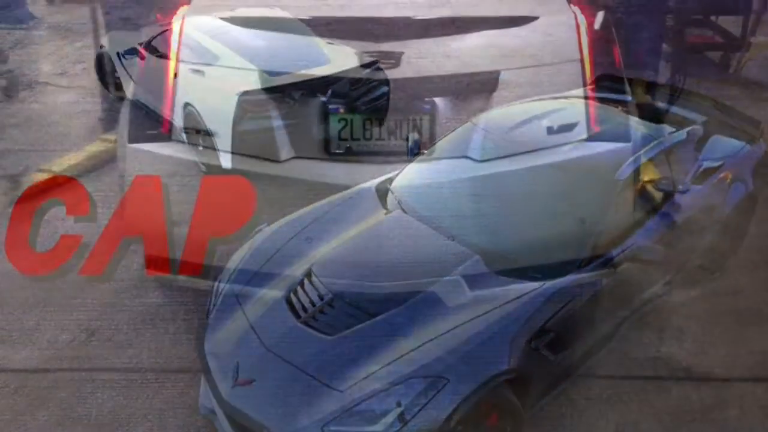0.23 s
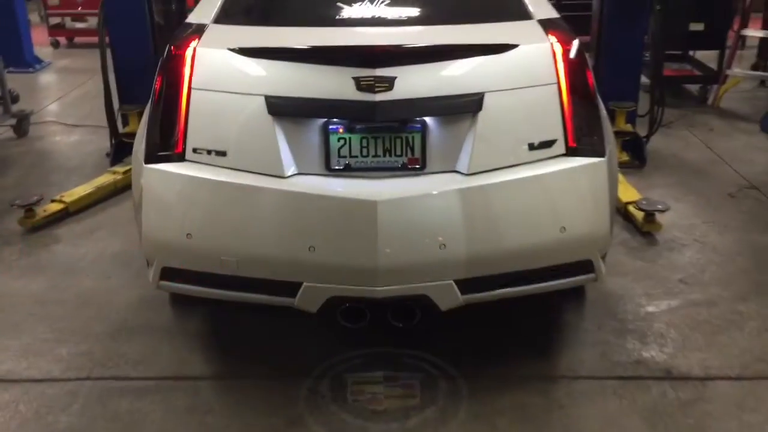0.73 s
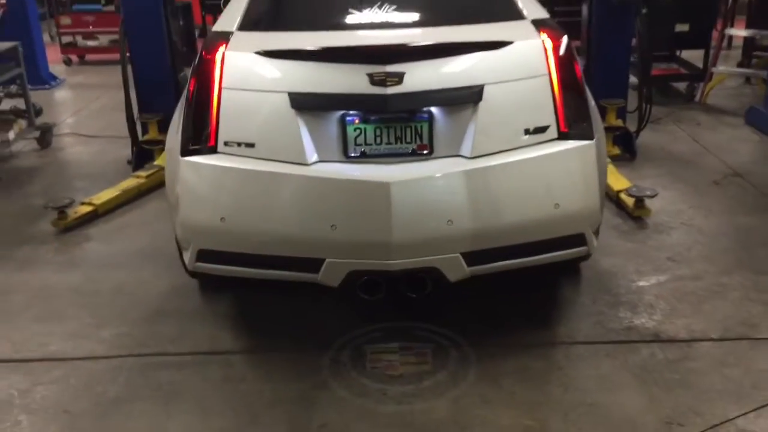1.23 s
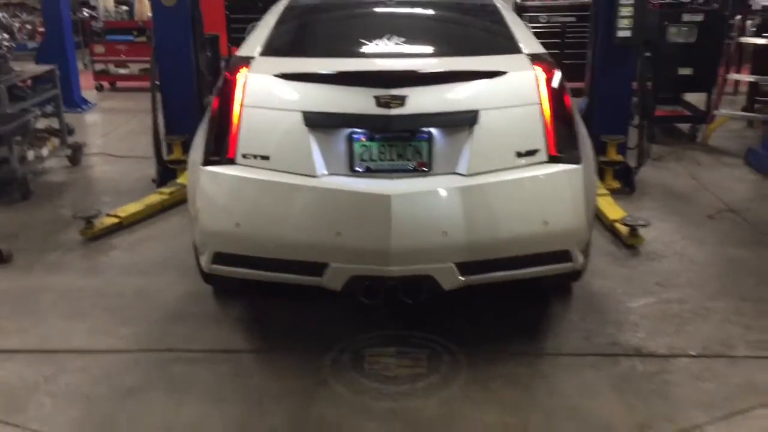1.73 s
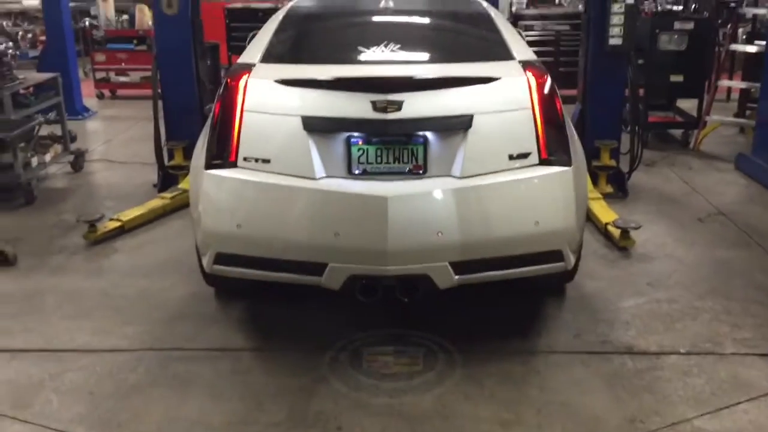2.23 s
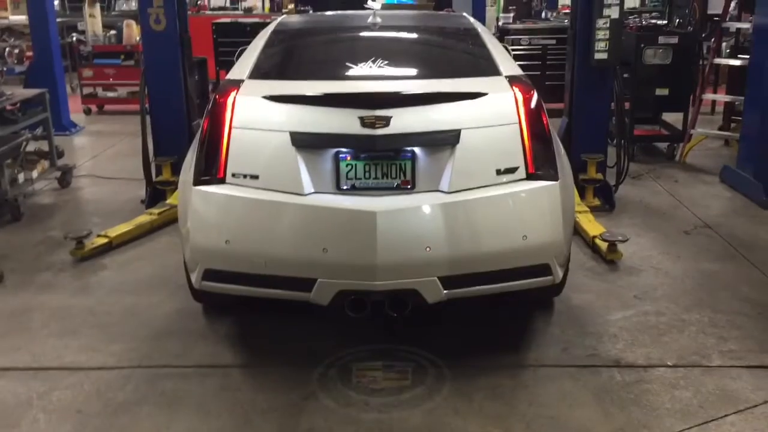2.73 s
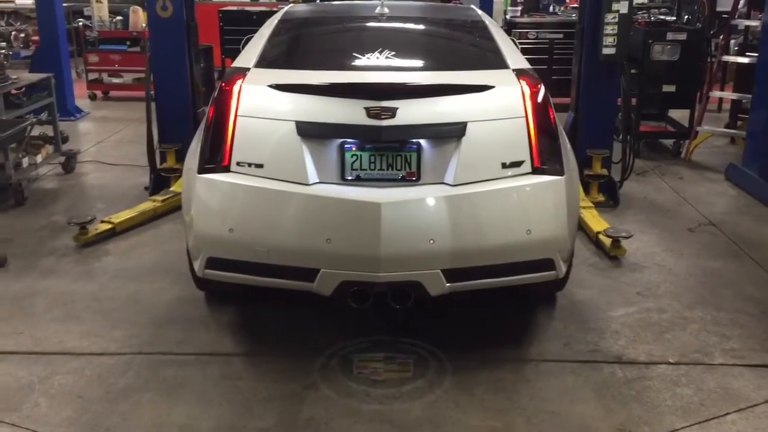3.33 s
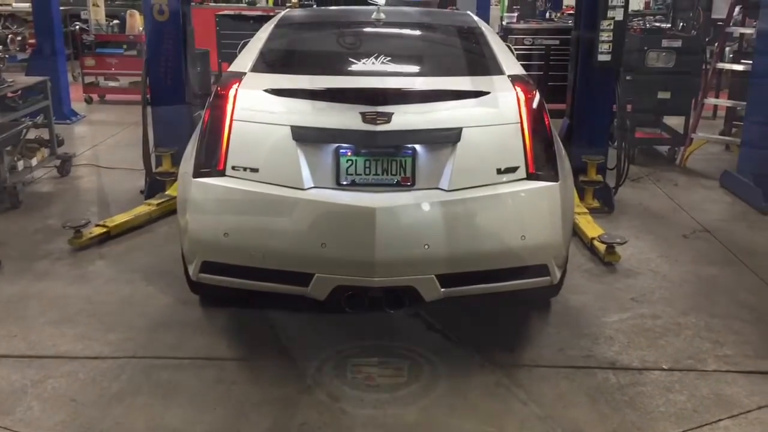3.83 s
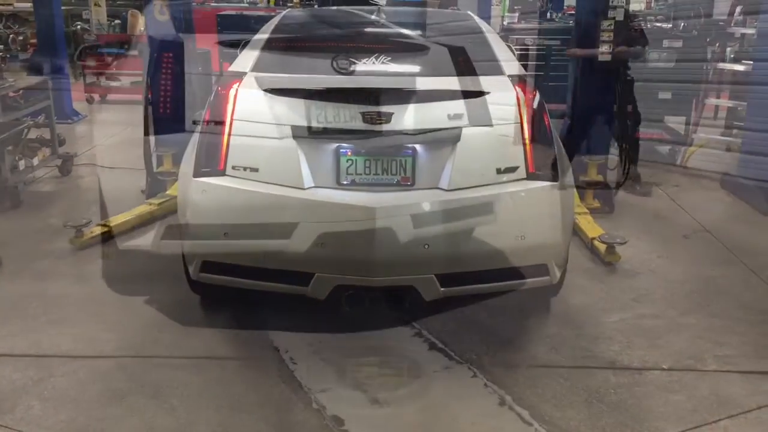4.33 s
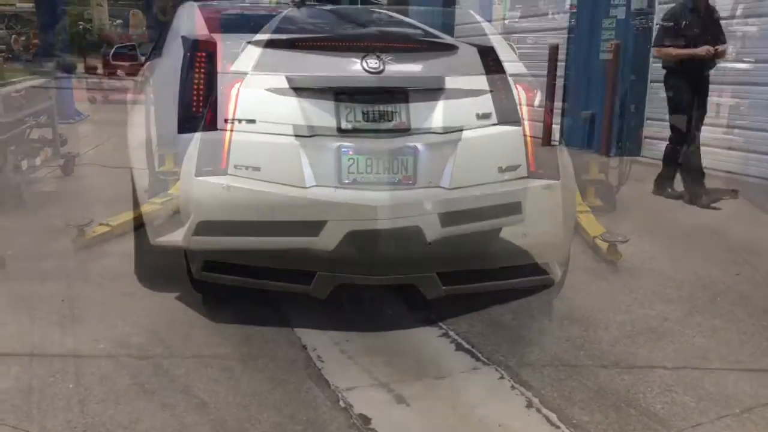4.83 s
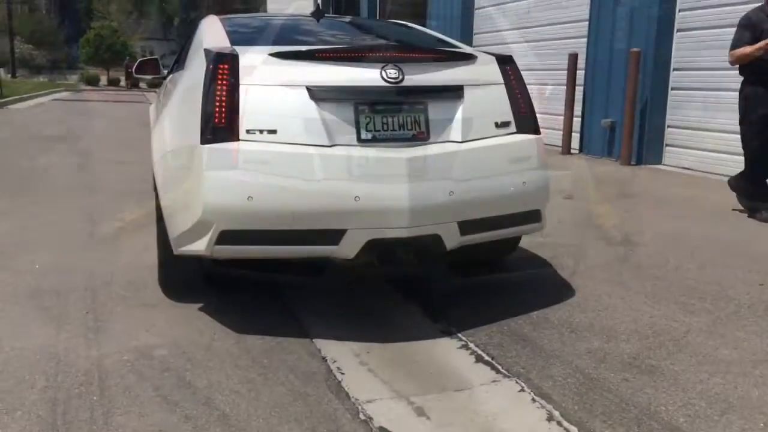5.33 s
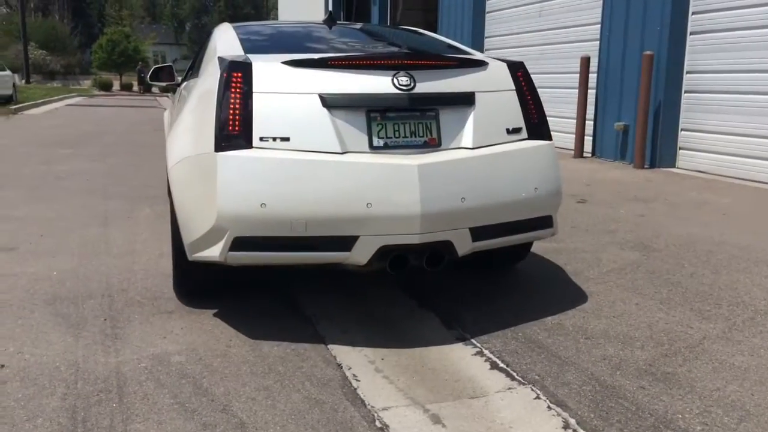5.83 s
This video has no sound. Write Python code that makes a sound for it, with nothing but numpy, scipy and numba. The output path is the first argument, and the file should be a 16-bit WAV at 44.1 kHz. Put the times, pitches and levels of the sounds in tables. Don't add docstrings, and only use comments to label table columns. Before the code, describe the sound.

A phone microphone behind the tailpipes catches a loping V8 idle, about three surges a second, with clustered metallic crackles and hissing gas over low pipe boom, reverberant indoors. The sound dissolves into open air: steadier humming and rumbling, a brief stumble, then a hard rev. Pitch rises quickly, bass drops away as the microphone overloads, and a coarse midrange howl and roar remains.

```python
import sys
import numpy as np
from scipy import signal
from scipy.fft import rfft, irfft, next_fast_len
from scipy.io import wavfile
from scipy.ndimage import uniform_filter1d
from numba import njit

SR = 44100
rng = np.random.default_rng(int(sys.argv[2]) if len(sys.argv) > 2 else 0)


def dump(signal):
    limited = np.clip(np.atleast_2d(signal).T, -1, 1)
    pcm = np.round(limited * 32767).astype(np.int16)
    wavfile.write(sys.argv[1], SR, pcm)


def nominal_scale(level):
    x = np.asarray(level, float) / 20
    return 10 ** x


N = 268524
T = np.arange(N) / SR
IDLE_FIRING_HZ = 46.2


# first t/s, last t/s, first level/dB, last level/dB, treble share level/dB
FIRING_RUNS = [(.078, .143, -16, -15, -25.5), (0.21, .227, -25, -23.5, -8), (0.333, .381, -15, -12, -14),
               (0.691, .719, 1, 0, -18.5), (0.774, 0.838, -1.5, -10, -18.5), (0.971, 0.995, -5.5, -7, -16),
               (1.036, 1.066, 0.7, -4.5, -20.5), (1.253, 1.28, -10, -4.5, -19.5),
               (1.322, 1.345, -4.5, -4.5, -17), (1.448, 1.47, -8.5, -7.5, -20),
               (1.581, 1.693, -5.5, -14, -19), (1.843, 1.889, -7, -13, -15), (2.171, 2.344, -12, -8, -14),
               (2.403, 2.503, -21, -32, -18), (2.522, 2.636, -18, -0.5, -14), (2.673, 2.697, -8, -2, -21.5),
               (2.881, 2.927, -13.5, -6.5, -21), (3.117, 3.186, -34, -19, -26.5),
               (3.21, 3.255, -12.5, -7, -11.5), (3.3, 3.36, -7, -7.5, -18), (3.562, 3.666, -6, -2, -18),
               (3.905, 4.008, -7.5, -6.5, -21), (4.463, 4.51, -17, -9.5, -14),
               (4.558, 4.574, -9, -6, -15.5)]
# t/s, peak level/dB, treble share level/dB
LONE_FIRINGS = [(.012, -17.5, -7.5), (.292, -16.5, -5.5), (.427, -5.5, -21), (.486, -2.5, -17),
                (.577, -5.5, -14), (.648, -6, -18), (.928, -5, -16.5), (1.123, -5.5, -18.5),
                (1.192, -18.5, -13), (1.383, -8, -13), (1.538, -8.5, -21), (1.733, -2, -23),
                (1.767, -18.5, -2.5), (1.799, -19, -15), (1.936, -7.5, -6), (1.952, -22, -9),
                (1.997, -8, -21), (2.06, -6.5, -15.5), (2.81, -17, -9.5), (2.969, -3.5, -19),
                (3.033, -17, -14), (3.703, -5.5, -10), (3.86, -8, -15.5), (4.104, -19, -6),
                (4.159, -12.5, -8), (4.206, -2, -17.5), (4.257, -7, -36), (4.384, -32, -22),
                (4.688, -27, -19)]


def hard_firings():
    timing_jitter_s, treble_scatter_db = 0.0012, 0.5
    rows = [np.array(LONE_FIRINGS)]
    for first, last, first_db, last_db, treble_db in FIRING_RUNS:
        count = int(round((last - first) * IDLE_FIRING_HZ)) + 1
        share = np.linspace(0, 1, num=count)
        chance = rng.standard_normal((2, count))
        times = first + share * (last - first) + timing_jitter_s * chance[0] * (share > 0)
        levels = first_db + share * (last_db - first_db)
        rows.append(np.transpose([times, levels, treble_db + treble_scatter_db * chance[1]]))
    return np.concatenate(rows).T


def spits():
    rise_s, jet_rise_s, fall_s = 0.004, 0.0018, 0.0087
    s, peak_db, treble_db = hard_firings()
    at = (s * SR).astype(int)
    t = T[:SR // 8]
    gust = (1 - np.exp(-t / rise_s)) * np.exp(-t / fall_s)
    jet_gust = 0.78 * (1 - np.exp(-t / jet_rise_s)) * np.exp(-t / fall_s)
    cracks, treble = np.zeros((2, N))
    cracks[at] = nominal_scale(peak_db)
    treble[at] = nominal_scale(peak_db + treble_db - np.mean(treble_db))
    return cracks, signal.fftconvolve(cracks, gust)[:N], signal.fftconvolve(treble, jet_gust)[:N]


# f/Hz, width f/Hz, level/dB
TIP_MODES = [(866, 82, 4.5), (1122, 86, 3), (1535, 69, -1), (1923, 113, -1.5), (2169, 41, -1.5),
             (2480, 340, -6), (3620, 277, -4), (4210, 630, -8.5)]


def tailpipe_tips(cracks, gust, flow):
    push = crackle(2.43, 150) * (nominal_scale(-9) * gust + flow) + nominal_scale(5) * cracks
    return nominal_scale(13) * ring(push, TIP_MODES, patchy_db=3, rate=35)


# f/Hz, level/dB per Hz
JET_SPECTRUM = [(1470, -8), (2500, -10), (3030, -13), (3670, -2.5), (4940, -5), (8840, -5.5),
                (10400, -10.5), (14600, -15.5), (15600, -21)]
# f/Hz, width f/Hz, level/dB
JET_EDGES = [(3380, 460, -1), (4130, 440, 7), (5800, 620, -14), (6850, 120, -17), (9180, 1900, -9),
             (12400, 1600, -0.5)]


def treble_jet(jet_gust, flow, flow_db):
    air = crackle(3.3, 120)
    edges = unit(ring(air, JET_EDGES, True, patchy_db=4.5, rate=45))
    jet = unit(colour(air, JET_SPECTRUM)) + nominal_scale(-4) * edges
    weak_flow_loss = np.clip(nominal_scale(0.75 * (flow_db + 21)), 0, 1)
    return jet * (nominal_scale(-9) * jet_gust + flow * weak_flow_loss)


# t/s, level/dB, f/Hz
CATCHES = [(.0, -22, 87), (.16, -23.5, 77), (0.309, -17.5, 86.4), (.43, -19.5, 89), (.52, -13.5, 72.4),
           (.75, -12.5, 71.6), (.91, -14, 78), (1.03, -12.5, 76), (1.26, -12, 77), (1.368, -24, 74.4),
           (1.46, -15.5, 81), (1.61, -13, 76), (1.73, -21, 92), (1.82, -13, 83), (1.96, -14, 84.5),
           (2.11, -13, 73), (2.2, -12.5, 75), (2.33, -15.5, 66.6), (2.489, -12.5, 83), (2.58, -12, 81.5),
           (2.68, -19, 94), (2.77, -14.5, 80), (2.91, -11.5, 82), (3.05, -19, 92), (3.23, -9.5, 80.5),
           (3.401, -13.5, 66.6), (3.58, -14, 80), (3.69, -14.5, 65.6), (3.875, -13.5, 78), (4.02, -19, 73),
           (4.14, -18, 80), (4.26, -18, 83), (4.36, -12.5, 86), (4.52, -12.5, 84.5), (4.63, -14, 101),
                (4.74, -12.5, 101)]


def catches():
    ring_up_s = 0.0149
    s, boom_db, boom_hz = np.transpose(CATCHES)
    kicks = np.zeros(N)
    kicks[(np.clip(s - ring_up_s, 0, None) * SR).astype(int)] = nominal_scale(boom_db)
    level_db = swells(s, s, boom_db, rise=102, fall=67, rest_db=-27)
    return kicks, level_db, np.interp(T, s, boom_hz)


# f/Hz, width f/Hz, level/dB
LOWEST_PIPE_MODE = [(45.5, 6.8, 3.5)]


def pipe_boom(thumps, boom_db, boom_hz):
    width_hz = 20.6
    boom = unit(svf(svf(thumps, boom_hz, width_hz), boom_hz, width_hz))
    low = unit(ring(thumps, LOWEST_PIPE_MODE, True))
    return nominal_scale(boom_db) * steady(boom + nominal_scale(-15) * low, 0.05)


# f/Hz, width f/Hz, level/dB
BARK_MODES = [(129.1, 18, 5.5), (191.6, 36, -5.5), (241.4, 18, 1.5), (286.2, 26, -4), (346.5, 73, -18)]


def pipe_bark(thumps, bark_db):
    return nominal_scale(bark_db) * steady(ring(thumps, BARK_MODES, True, patchy_db=3.0, rate=12), 0.09)


# f/Hz, width f/Hz, level/dB
HOLLOW_MODES = [(460, 220, 9.5), (555, 196, 12), (620, 73, -44)]


def hollow_body(bark_db):
    return nominal_scale(bark_db - 24) * steady(ring(rng.standard_normal(N), HOLLOW_MODES, True, patchy_db=3.5), 0.1)


# start t/s, length t/s, bark level/dB, gas flow level/dB
LOPES_OF_IDLE = [(0.028, .15, -23, -22.5), (0.299, 0.16, -18, -19.5), (0.644, 0.15, -15, -18),
                 (0.955, 0.17, -14, -17.5), (1.26, .14, -15, -17.5), (1.462, 0.067, -17.5, -19),
                 (1.62, 0.11, -16, -17.5), (1.886, 0.16, -16, -14.5), (2.18, 0.16, -15, -18),
                 (2.534, 0.16, -15, -18.5), (2.912, 0.13, -13.5, -14.5), (3.209, 0.14, -14.5, -16),
                 (3.567, 0.14, -14, -22), (3.863, 0.15, -16.5, -18.5), (4.131, 0.18, -18, -16),
                 (4.443, 0.21, -18.5, -19.5), (4.84, .25, -21.5, -2)]


def lope():
    start, length, bark_db, flow_db = np.transpose(LOPES_OF_IDLE)
    peak = start + 0.84 * length
    bark = swells(peak, peak, bark_db, rise=45, fall=61, rest_db=-23.5)
    flow = swells(start + 0.34 * length, start + length, flow_db, rise=100, fall=186, rest_db=-31.5)
    return bark, flow


# t/s, boom level/dB, gas flow level/dB
WORKSHOP_FADE = [
    (0, 0, 0),
    (4.3, 0, 0),
    (4.72, 0, -10),
    (4.82, -14, -16),
    (5.2, -20, -26),
]


def workshop():
    bark_db, flow_db = lope()
    kicks, boom_db, boom_hz = catches()
    boom_fade, flow_fade = nominal_scale(curves(WORKSHOP_FADE, -124))
    idle_hz = np.full(N, IDLE_FIRING_HZ)
    pulses, phase, size = firings(idle_hz, jitter=0.21, scatter_db=1.5)
    cracks, gust, jet_gust = spits()

    thumps = unit(pulses) + 0.32 * size * rng.standard_normal(N)
    thumps = thumps + 0.67 * unit(np.sqrt(cracks)) + 0.45 * unit(kicks)

    flow = flow_fade * nominal_scale(flow_db - 9.5) * unit(size * (1.6 + np.exp(-phase / 0.31)))
    gas = walls(tailpipe_tips(cracks, gust, flow), t60_s=0.36, db=-5)
    gas = gas + nominal_scale(-2.5) * walls(treble_jet(jet_gust, flow, flow_db), t60_s=0.31, db=-6.5)
    gas = signal.sosfilt(signal.butter(6, 790, "high", fs=SR, output="sos"), gas)
    pipes = pipe_bark(thumps, bark_db) + hollow_body(bark_db)
    return boom_fade * pipe_boom(thumps, boom_db, boom_hz) + (T < 5.2) * (pipes + gas)


# f/Hz, level/dB per Hz
WIDE_SPECTRUM = [(26, -62), (45, -19.5), (262, -14), (334, -14), (495, -9.5), (559, -7.5), (868, -7),
                 (1380, -9), (1520, -9), (2150, -11.5), (2880, -8.5), (3590, -11), (10800, -18),
                 (14100, -22), (15600, -30)]
# f/Hz, width f/Hz, level/dB
WIDE_MODES = [(508, 75, -8), (811.4, 43.6, -18), (1173, 150, -4.5), (1650, 58, -18)]
# t/s, f/Hz
HOWL_PITCH = [
    (5.4, 1390),
    (5.55, 1390),
    (5.7, 1320),
    (5.8, 1400),
    (5.95, 1350),
    (6.1, 1330),
]


def wide_open_roar(gate):
    width_hz = 110.0
    howl_hz = curves(HOWL_PITCH)[0] * (1 + 0.025 * walk(14))
    rush = gate * crackle(1.3, 150)
    howl = unit(svf(rush * nominal_scale(4 * walk(35)), howl_hz, width_hz))
    overtone = unit(svf(rush * nominal_scale(5 * walk(35)), 2.07 * howl_hz, 1.6 * width_hz))
    wide = unit(colour(rush, WIDE_SPECTRUM)) + nominal_scale(-5) * ring(rush, WIDE_MODES, True, patchy_db=4, rate=40)
    return wide + nominal_scale(-7.5) * (howl + nominal_scale(-5.5) * overtone)


# f/Hz, level/dB per Hz
PART_SPECTRUM = [(350, -28), (600, -1), (879, -10.5), (1010, -3.5), (1140, 6.5), (1240, -3), (1710, -2.5),
                 (2190, -9.5), (3160, -6), (3530, -10), (5920, -14), (14300, -25.5), (15600, -31)]
# f/Hz, level/dB per Hz
LIGHT_SPECTRUM = [(380, -43), (640, -19), (792, -9), (918, 1.5), (1790, -9), (2530, -11.5), (2890, -4.5),
                  (3630, -10.5), (4040, -8.5), (8420, -11.5), (12100, -15.5), (15600, -21)]


def exhaust_roar(gate):
    hiss = gate * rng.standard_normal(N)
    part = np.interp(T, [5.04, 5.16], [0, 1])
    narrow = part * unit(colour(hiss, PART_SPECTRUM)) + (1 - part) * unit(colour(hiss, LIGHT_SPECTRUM))
    opening = np.interp(T, [5.4, 5.5], [0, np.pi / 2])
    return np.sin(opening) * steady(wide_open_roar(gate), 0.019) + np.cos(opening) * narrow


# t/s, f/Hz, level/dB
REVS = [
    (4.72, 100.9, -26),
    (4.83, 98.1, -11),
    (5.02, 88.75, -16),
    (5.119, 97.2, -14),
    (5.226, 126.4, -13),
    (5.339, 147, -14),
    (5.414, 158.2, -11.5),
    (5.44, 157.6, -25),
    (5.49, 161.3, -33),
]
ORDER_LEVELS = [1, -1.5, -8]
# f/Hz, level/dB
MUFFLER_PASS = [(90, 2), (125, -7.5), (153, -1.5), (195, -16), (225, 1.5), (300, -7.5), (380, -12),
                (475, -0.5)]


def firing_rate():
    s, rate_hz = np.transpose(REVS)[:2]
    return np.interp(T, np.r_[s, s[-1] + 0.2], np.r_[rate_hz, 215])


def firing_orders(hz):
    turn = 2 * np.pi * np.cumsum(hz) / SR
    level_db = curves(REVS, -90)[1]
    stumble_db = -9 * np.clip(1 - abs(T - 4.85) / 0.018, 0, 1)
    muffler_hz, muffler_db = np.transpose(MUFFLER_PASS)
    rough = np.interp(T, [5.05, 5.2], [0.7, 1])
    orders = 0
    for k, order_db in enumerate(ORDER_LEVELS):
        db = np.interp(T - k * 0.025, T, level_db) + order_db + stumble_db
        db = db + np.interp(np.log((k + 1) * hz), np.log(muffler_hz), muffler_db)
        db = db + (2.5 + k) * rough * walk(60)
        angle = (k + 1) * (turn + 0.22 * rough * walk(50))
        orders = orders + np.sqrt(2) * nominal_scale(db) * np.sin(angle)
    return orders


# f/Hz, width f/Hz, level/dB
GROWL_MODES = [(429.4, 44, 3.5), (511, 82, -7.5), (380, 92, -1), (596, 70, -16.5)]


def muffler_growl(pulses, gate):
    tone = unit(ring(pulses, GROWL_MODES, True))
    breath = unit(ring(gate * rng.standard_normal(N), GROWL_MODES, True))
    return steady(tone + 1.3 * breath, 0.067)


def low_rumble(gate):
    rumble = ring(gate * rng.standard_normal(N), [(185, 155, 2), (318, 120, -5.5)], True, patchy_db=2.0)
    drone = ring(gate * rng.standard_normal(N), [(70, 53, 7.5)], True)
    drone_loss_db = -11 * np.interp(T, [5.17, 5.24], [0, 1])
    return steady(rumble + nominal_scale(drone_loss_db) * drone, 0.14)


# t/s, level/dB
THROTTLE = [
    (4.3, -30),
    (4.58, -24),
    (4.7, -25.5),
    (4.83, -24.5),
    (5.1, -23),
    (5.17, -17.5),
    (5.42, -14),
    (5.56, -7.5),
    (6.09, -8.5),
]
# t/s, drop level/dB
MISFIRE_DROPS = [
    (4.362, -14),
    (5.021, -15),
    (5.115, -4),
]
# t/s, level/dB
OUTDOOR_RISE = [
    (4.0, -14),
    (4.4, 1),
    (4.75, 1.4),
]


def throttle():
    overload = np.interp(T, [5.44, 5.52], [0, 1])
    early_overload = np.interp(T + 0.036, T, overload)
    roar_db = curves(THROTTLE)[0]
    fade_db = np.where(T < OUTDOOR_RISE[0][0], -90, curves(OUTDOOR_RISE)[0])
    dent_db = sum(db * np.clip(1 - abs(T - s) / 0.018, 0, 1) for s, db in MISFIRE_DROPS)
    load_db = roar_db + 25
    growl_db = fade_db - 25.5 + 0.64 * load_db - 14 * overload + 0.62 * dent_db
    rumble_db = fade_db - 26.5 + 0.68 * load_db - 28 * early_overload
    return growl_db, np.where(T < THROTTLE[0][0], -90, roar_db + dent_db), rumble_db


def outdoors():
    hz = firing_rate()
    pulses, phase, size = firings(hz, jitter=0.07, scatter_db=1.65)
    gate = size ** 0.81 * (5.3 + np.exp(-phase / 0.43))
    growl_db, roar_db, rumble_db = throttle()
    growl = nominal_scale(growl_db - 2) * muffler_growl(pulses, gate)
    roar = nominal_scale(roar_db) * exhaust_roar(gate)
    return firing_orders(hz) + growl + roar + nominal_scale(rumble_db) * low_rumble(gate)


def firings(hz, jitter, scatter_db):
    chance = rng.standard_normal((N // 50, 2))
    edges = np.cumsum(1 + np.clip(jitter * chance[:, 0], -0.5, 0.5))
    turns = np.interp(np.cumsum(hz) / SR, np.r_[0, edges], np.arange(len(edges) + 1))
    cycle = turns.astype(int)
    size = nominal_scale(scatter_db * chance[cycle, 1])
    return size * (np.diff(cycle, prepend=0) > 0), turns - cycle, size


# t/s, level/dB
REST_RISE = [
    (0, -12),
    (.6, 2),
]


def swells(start_s, end_s, db, rise, fall, rest_db):
    t = T[::64, None]
    each = db - rise * np.clip(start_s - t, 0, None) - fall * np.clip(t - end_s, 0, None)
    rest = rest_db + curves(REST_RISE)[0][::64]
    return np.interp(T, t[:, 0], np.maximum(each.max(axis=1), rest))


def crackle(grain_db, rate):
    return unit(rng.standard_normal(N) * nominal_scale(grain_db * walk(rate)))


def ring(x, modes, twice=False, patchy_db=0, rate=25):
    out = 0
    for k, (hz, width, db) in enumerate(modes):
        b, a = signal.iirpeak(hz, hz / width, SR)
        drive = x * nominal_scale(patchy_db * walk(rate)) if patchy_db else x
        y = signal.lfilter(b, a, drive)
        if twice:
            y = signal.lfilter(b, a, y)
        out = out + (-1) ** k * nominal_scale(db) * y
    return out


@njit
def svf(x, hz, width):
    y, band, low = np.empty(len(x)), 0., 0.
    for i in range(len(x)):
        g, k = np.tan(np.pi * hz[i] / SR), width / hz[i]
        v = (band + g * (x[i] - low)) / (1 + g * (g + k))
        band, low, y[i] = 2 * v - band, low + 2 * g * v, k * v
    return y


def colour(x, spectrum):
    hz, db = np.transpose(spectrum)
    size = next_fast_len(N)
    bins = np.fft.rfftfreq(size, 1 / SR) + 1
    gain = nominal_scale(np.interp(np.log(bins), np.log(hz), db))
    return irfft(rfft(x, size) * gain, size)[:N]


def walk(rate):
    knots = rng.standard_normal(int(T[-1] * 200) + 2)
    return 1.2 * np.interp(T * min(rate, 199), np.arange(len(knots)), knots)


def curves(table, outside=None):
    s, *columns = np.transpose(table)
    return [np.interp(T, s, c, outside, outside) for c in columns]


def unit(x):
    return x / np.sqrt(np.mean(x ** 2))


def steady(x, span_s):
    return x / np.sqrt(uniform_filter1d(x ** 2, int(span_s * SR)) + 1e-9)


def walls(x, t60_s, db):
    t = T[:SR // 2]
    tail = rng.standard_normal(len(t)) * nominal_scale(-60 * t / t60_s) * (t > 0.008)
    return x + nominal_scale(db) * signal.fftconvolve(x, tail / np.sqrt(np.sum(tail ** 2)))[:N]


def scene():
    return np.tile(workshop() + outdoors(), (2, 1))


def top_cut(x):
    return signal.sosfilt(signal.butter(12, 15720, fs=SR, output="sos"), x)


def record(dry):
    loud = np.clip(np.tanh(0.8 * dry) / 0.755, -0.96, 0.96)
    return top_cut(loud)


dry = scene()
out = record(dry)
dump(out)
```